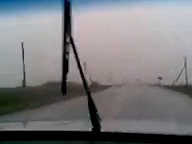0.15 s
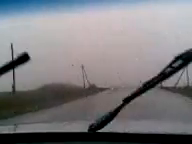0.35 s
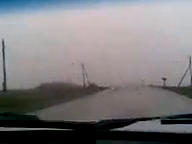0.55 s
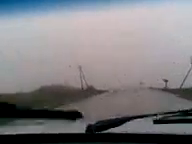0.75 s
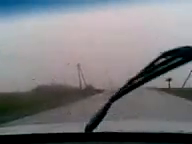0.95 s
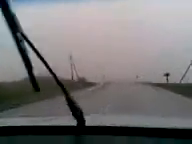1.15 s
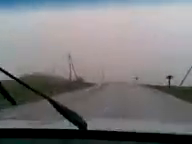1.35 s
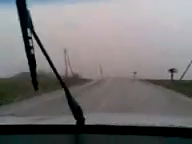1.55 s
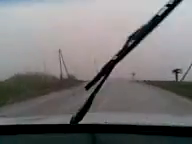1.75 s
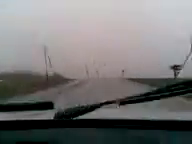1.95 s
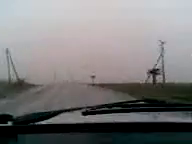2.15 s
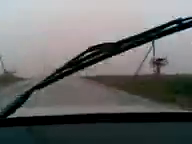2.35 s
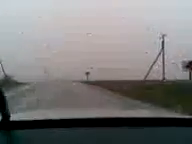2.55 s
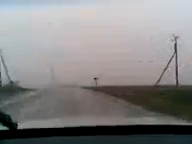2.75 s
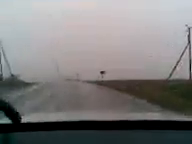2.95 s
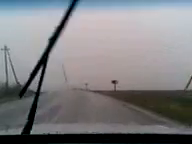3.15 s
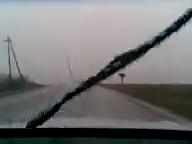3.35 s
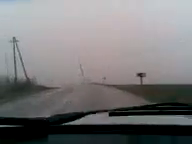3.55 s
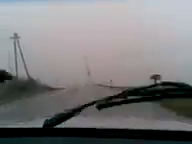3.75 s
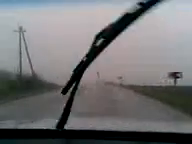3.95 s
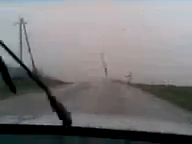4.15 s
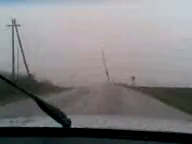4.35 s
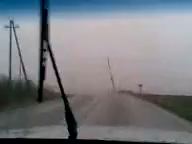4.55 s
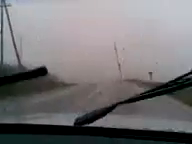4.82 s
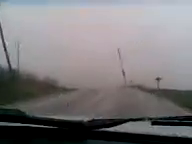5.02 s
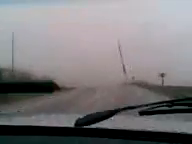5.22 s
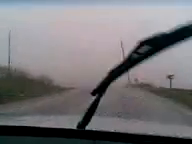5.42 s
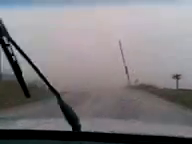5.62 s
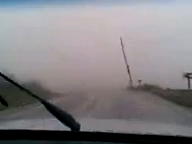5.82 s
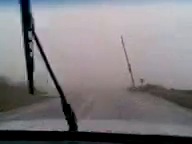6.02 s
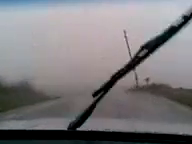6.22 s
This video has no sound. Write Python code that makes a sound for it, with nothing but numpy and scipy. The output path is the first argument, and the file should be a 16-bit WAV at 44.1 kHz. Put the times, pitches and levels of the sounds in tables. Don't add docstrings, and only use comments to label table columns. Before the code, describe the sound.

A double wiper clack opens immediately, followed by loose rattling and a soft rubbery hiss across wet glass. Single and double clacks then alternate in a quick regular beat, far louder than the dull road rumble and wind roar beneath. Small panel booms interrupt; later a mid-pitched wiper motor hum emerges and the road swells. Close cabin sound from a cheap phone, muffled yet gritty, with overloaded snaps, ending during another sweep.

```python
import sys
import numpy as np
from scipy import signal
from scipy.io import wavfile
from scipy.ndimage import uniform_filter1d

SR = 44100
rng = np.random.default_rng(int(sys.argv[2]) if len(sys.argv) > 2 else 0)


def undo_db(level):
    steps = np.asarray(level, float) / 20
    return 10 ** steps


def wav_record(signal):
    frames = np.transpose(np.atleast_2d(signal))
    bounded = np.clip(frames, -1, 1)
    quanta = np.round(bounded * 32767).astype(np.int16)
    wavfile.write(sys.argv[1], SR, quanta)


N = 275625

# t/s, level/dB
ROAD = [(0, -39.5), (.65, -39), (1.08, -40.5), (1.4, -37), (2.3, -40), (2.6, -37.5), (3.15, -42.5),
        (3.31, -35), (3.55, -42.5), (3.9, -35.5), (4.37, -40.5), (4.74, -37), (5.25, -42.5), (5.52, -36),
        (5.85, -42), (6.12, -35), (6.25, -40)]
# f/Hz, density/dB
RUMBLE = [(12, -74), (20, -46), (46, -26), (86, -11.5), (117, -1), (184, -2), (216, -7), (242, -4.5),
          (285, -8.5), (400, -17.5), (520, -39), (880, -120)]
# f/Hz, density/dB
ROAR = [(150, -30.5), (250, -5), (355, -6.5), (434, 0), (523, -5.5), (583, -5.5), (820, -3), (966, -2.5),
        (1110, -7), (1600, -24.5), (2080, -46.5), (3520, -120)]
# f/Hz, width/Hz, level/dB
CABIN = [(120, 27, -46), (185.4, 32, -47.5), (240.5, 20, -49.5), (435.6, 34, -48), (693, 27, -53),
         (953.5, 41, -53)]
# t/s, f/Hz, level/dB
MOTOR = [(0, 835, -51), (1, 830, -51), (1.9, 825, -49), (2.8, 830, -50), (3.2, 840, -43), (3.6, 832, -46),
         (3.9, 826, -42), (4.25, 824, -45.5), (4.6, 826, -44), (5.1, 824, -44), (5.6, 823, -44),
         (6.25, 818, -47)]
# t/s, peak level/dB, f/Hz
BUMPS = [(.13, -31, 465), (.395, -29.5, 940), (.453, -30, 440), (.679, -25.5, 115.7), (.853, -29, 1034),
         (.906, -29.5, 116), (1.068, -31, 1193), (1.248, -28.5, 187), (1.405, -31, 190), (1.683, -33, 426),
         (1.823, -28.5, 948), (2.003, -30, 188.2), (3.032, -29.5, 1140), (3.05, -30, 1020),
         (3.199, -29, 836), (3.843, -22.5, 420), (3.87, -28, 480), (3.942, -28.5, 172.3),
         (4.528, -26.5, 827), (4.702, -30, 442), (4.876, -32.5, 479.7), (5.995, -27, 1014),
         (6.02, -30, 1240), (6.055, -29, 948), (6.188, -32, 755)]
# start t/s, level at its height/dB, sag by the end of the sweep/dB
SWEEPS = [
    (-.68, -40, -3),
    (0.1, -38.5, -2),
    (0.8, -39, -1),
    (1.47, -39.5, -3.5),
    (2.24, -40.5, -6.5),
    (3, -41, -7),
    (3.73, -39, -7.5),
    (4.5, -39.5, -5.5),
    (5, -40.5, -8),
    (6, -40, -4),
]
# f/Hz, density/dB
HISS = [(650, -21), (1100, -8), (1200, -2), (1290, -7.5), (1840, -6.5), (2250, -3), (2630, -4),
        (2920, -8.5), (3480, -11), (3720, -14), (4110, -23), (5340, -54), (9040, -120)]
# t/s, level/dB, t60/s
FLIPS = [(.053, -23.5, 0.19), (0.072, -24.5, 0.14), (0.78, -20, 0.14), (1.515, -22.5, 0.067),
         (1.53, -18, 0.11), (2.24, -19.5, 0.091), (2.977, -28, 0.3), (2.994, -27, 0.13), (3.711, -38, .1),
         (3.728, -20.5, 0.15), (4.472, -22.5, 0.16), (4.485, -21.5, 0.13), (5.213, -23, 0.15),
         (5.936, -26.5, 0.14), (5.962, -23.5, 0.17)]
# f/Hz, density/dB
RATTLE = [(410, -46.5), (700, -24.5), (1190, -18), (1850, -1.5), (2080, -7), (2560, -7.5), (3010, -12.5),
          (3600, -11), (4110, -20), (5340, -61.5), (9040, -120)]
# t/s, peak level/dB, f/Hz, length/ms
SNAPS = [(.0562, -5.2, 2450, 1.12), (.0731, -2.9, 2030, 1.05), (.0744, -2.5, 2060, 1),
         (.0805, -10.5, 2090, 1.2), (.7834, -4.6, 2500, .95), (.7886, -9.4, 2300, 1.8),
         (.7903, -9.4, 2180, .61), (1.519, -6.2, 2520, 1.06), (1.5338, -3.9, 2190, 1.23),
         (1.5355, -4.6, 2100, 1.24), (2.2401, -6.7, 2370, .86), (2.2478, -7.4, 2360, 1.29),
         (2.9814, -11, 2210, 1.32), (2.9987, -2.6, 2000, 1.5), (3.0001, -6.5, 1980, 1.15),
         (3.0034, -9.8, 2030, 1.14), (3.006, -11.9, 2060, 1.5), (3.7285, -6.5, 2520, 1.13),
         (3.7374, -7.5, 2440, .4), (4.4749, -11.7, 2220, 1.33), (4.4767, -10.3, 2290, 1.04),
         (4.4898, -3.2, 2180, 1.1), (4.4912, -2.65, 2100, 1.15), (4.4933, -6.5, 2170, .93),
         (5.2122, -4.8, 2430, 1.07), (5.2175, -9.9, 2550, .76), (5.22, -8.2, 2500, 1.57),
         (5.9381, -12.6, 2420, 1.16), (5.9634, -5.2, 2080, 1.5), (5.9651, -7, 2050, 1)]

LEAD_HZ = 2700


def evened(x):
    return x / np.sqrt(np.mean(x ** 2) + 1e-20)


def curve(table, column):
    rows = np.array(table)
    return np.interp(np.arange(N) / SR, rows[:, 0], rows[:, column])


def noise(spectrum, patchy_db, flicker_db):
    frames, hz = N // 256 + 5, np.fft.rfftfreq(1024, 1 / SR)
    real, imag, patches = rng.standard_normal((frames, 513, 3)).T
    patches = uniform_filter1d(patches, size=8, axis=0)
    patches = evened(uniform_filter1d(patches, size=8, axis=1))
    f, db = np.transpose(spectrum)
    colour_db = np.interp(np.log(hz + 1), np.log(f + 1), db, left=-90, right=-90)
    spectra = (real + 1j * imag) * undo_db(colour_db[:, None] + patchy_db * patches)
    x = signal.istft(spectra, nperseg=1024, noverlap=768)[1][:N]
    steps = np.repeat(rng.standard_normal(N // 220 + 1), 220)[:N]
    flicker = evened(uniform_filter1d(steps, size=110))
    return evened(x * undo_db(flicker_db * flicker))


def resonate(x, hz, width):
    turn = np.exp(2j * np.pi * np.cumsum(hz * np.ones(len(x))) / SR)
    r = np.exp(-np.pi * width / SR)
    return 2 * (turn * signal.lfilter([1 - r], [1, -r], x / turn)).real


def hum_band(hz, width):
    return evened(resonate(resonate(rng.standard_normal(N), hz, width), hz, width))


def bursts(table, size):
    out, t = np.zeros(N + size), (np.arange(size) - size // 2) / SR
    side, last = 1, 0
    for s, db, hz, ms in table:
        side *= np.sign(np.cos(2 * np.pi * hz * (s - last)))
        last = s
        at = round(s * SR) - size // 2
        bell = .5 ** ((2000 * t / ms) ** 2)
        out[at:at + size] += side * undo_db(db) * np.cos(2 * np.pi * hz * t) * bell
    return out[:N]


def drag_db():
    rise_s, hold_s, sweep_s = .13, .26, .63
    points = []
    for s, db, sag_db in SWEEPS:
        points += [(s + rise_s, db), (s + hold_s, db), (s + sweep_s, db + sag_db)]
    return curve(points, column=1)


def road():
    drag = drag_db()
    load_db = drag - drag.mean()
    rumble_db = curve(ROAD, column=1) + .05 * load_db
    roar_db = -35.5 + .7 * load_db
    modes = sum(undo_db(db) * hum_band(hz, width) for hz, width, db in CABIN)
    rumble = undo_db(rumble_db + 1.0) * noise(RUMBLE, patchy_db=1.1, flicker_db=1.0)
    roar = undo_db(roar_db - 1.15) * noise(ROAR, patchy_db=2.36, flicker_db=.9)
    return rumble + roar + modes * undo_db(roar_db - roar_db.mean())


def motor():
    hz = curve(MOTOR, column=1)
    waver = evened(uniform_filter1d(rng.standard_normal(N), size=3000))
    line = np.sqrt(2) * np.sin(2 * np.pi * np.cumsum(hz + 4.5 * waver) / SR)
    fuzz = hum_band(hz, width=24)
    return undo_db(curve(MOTOR, column=2) + .3) * (.75 * line + .65 * fuzz)


def panels():
    booms = [(s, db, hz, 46.5 - 8.5 * np.log2(hz / 120)) for s, db, hz in BUMPS]  # ms, shorter per octave
    return undo_db(-1.5) * bursts(booms, size=6000)


def blades():
    return undo_db(drag_db() + 0.36) * noise(HISS, patchy_db=2.7, flicker_db=1.3)


def rattle(lips):
    t, power = np.arange(N) / SR, 0
    for s, db, t60 in FLIPS:
        age = np.maximum(t - s, 0)
        onset = np.minimum(age / 0.0011, 1)
        power = power + (undo_db(db - 60 * age / t60) * onset) ** 2
    hard = [(s, db, 0, 1.5 * ms) for s, db, hz, ms in lips if db > -14]
    dips = bursts(hard, size=400)
    return np.sqrt(power) * np.exp(-5 * dips) * noise(RATTLE, patchy_db=2.1, flicker_db=2.5)


def bounces(count):
    quiet_s, pair_s = .01, .0028
    length_ms = .9
    times = [-1] + [row[0] for row in SNAPS] + [99]
    chance, rows = rng.uniform(-1, 1, (len(SNAPS), count, 4)), []
    for before, (s, db, hz, ms), after, draws in zip(times, SNAPS, times[2:], chance):
        if s - before > quiet_s:
            lead_db = db - 9 if hz < 2200 else -18.5
            rows.append((s - .0021, lead_db, LEAD_HZ, length_ms))
        rest_s = pair_s if after - s > quiet_s else pair_s / 2
        for k, (late, force, pitch, length) in enumerate(draws):
            at = s + .0018 * (k + 1 + .2 * late)
            if at < after - rest_s:
                level_db = -12.5 + .35 * db - 1.5 * k + 2 * force - 3.5 * (k == 0)
                bounce_hz = (2423 - 59.5 * k) * (1 + .09 * pitch)
                rows.append((at, level_db, bounce_hz, length_ms * (1 + .35 * length)))
    return rows


def snaps(lips):
    arms = [(s, db - 19.5, 3423, 2.4) for s, db, hz, ms in SNAPS]
    cowl = [(s, -26.5, 1130, 2.2) for s, db, hz, ms in lips if hz == LEAD_HZ]
    return bursts(lips, size=400) + bursts(arms, size=1000) + bursts(cowl, size=1000)


def scene():
    place = np.arange(N)
    fade = np.minimum(np.minimum(place, place[::-1]) / (.004 * SR), 1)
    lips = sorted(SNAPS + bounces(count=5))
    mix = road() + motor() + panels() + blades() + rattle(lips) + snaps(lips)
    return (fade * mix)[None]


def roll_off(x):
    return signal.sosfilt(signal.butter(12, 16000, fs=SR, output="sos"), x)


def record(dry):
    rate_hz, edge_hz, ceiling = 8000, 4064, .705
    band = signal.firwin(1001, rate_hz / 2, window=("kaiser", 9), fs=SR)
    narrow = signal.oaconvolve(dry, band[None], "same")
    mirrored = narrow * (1 + 2 * np.cos(2 * np.pi * rate_hz * np.arange(N) / SR))
    smoother = signal.firwin(221, edge_hz, window=("kaiser", 10), fs=SR)
    smooth = signal.oaconvolve(mirrored, smoother[None], "same")
    smooth = signal.sosfilt(signal.butter(2, 45, "high", fs=SR, output="sos"), smooth)
    return roll_off(np.clip(smooth, -ceiling, ceiling))


dry = scene()
out = record(dry)
wav_record(out)
```